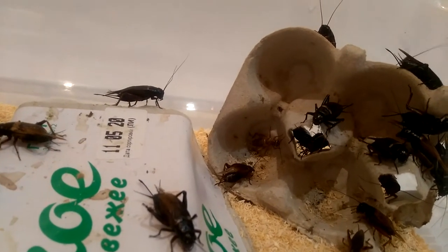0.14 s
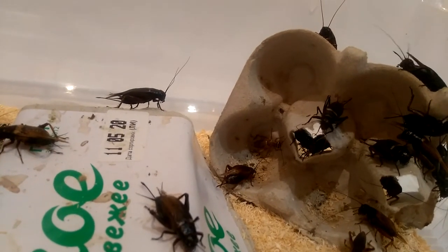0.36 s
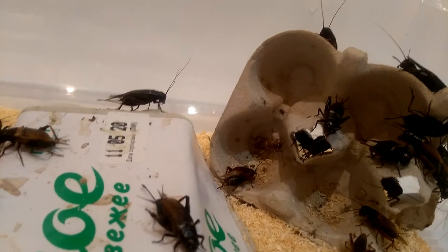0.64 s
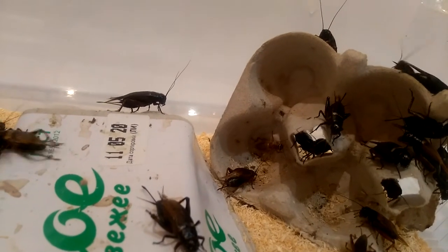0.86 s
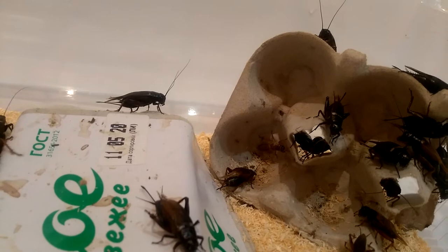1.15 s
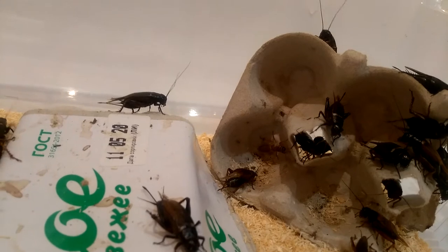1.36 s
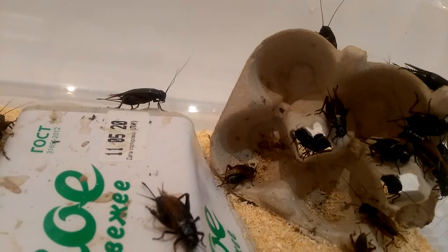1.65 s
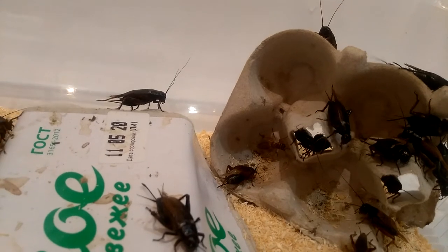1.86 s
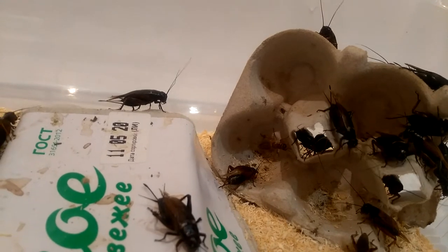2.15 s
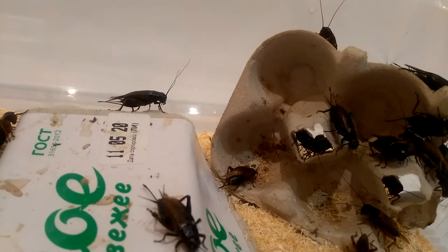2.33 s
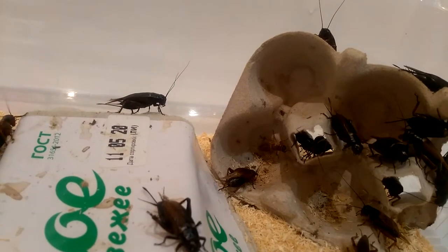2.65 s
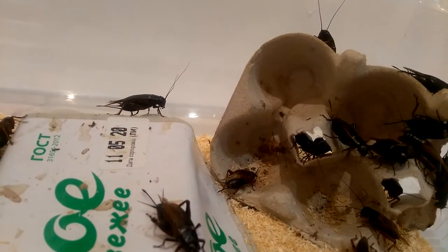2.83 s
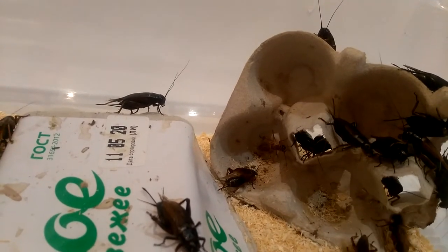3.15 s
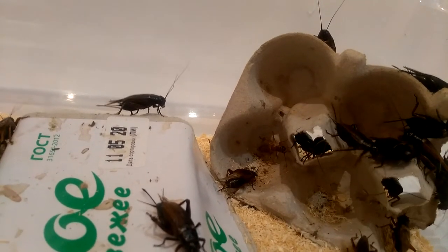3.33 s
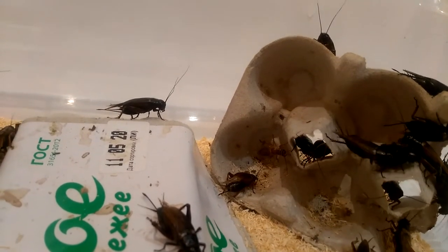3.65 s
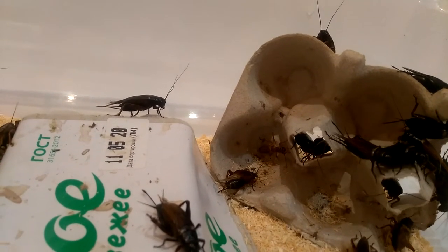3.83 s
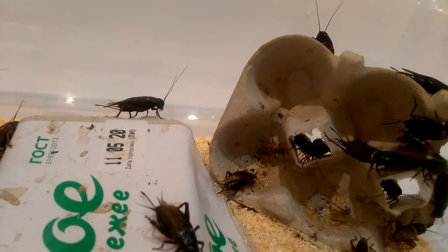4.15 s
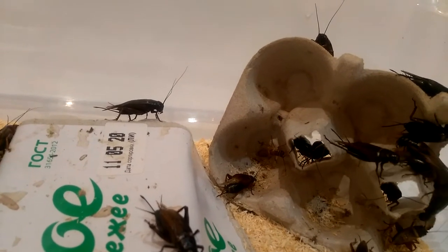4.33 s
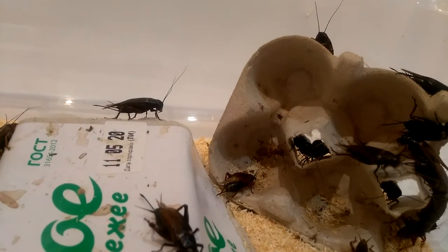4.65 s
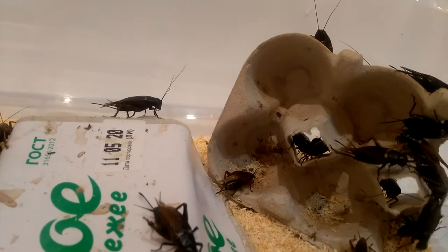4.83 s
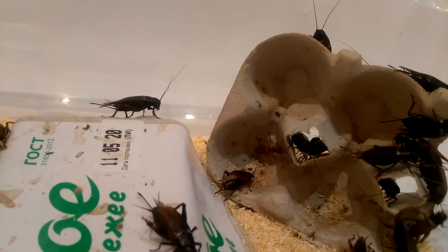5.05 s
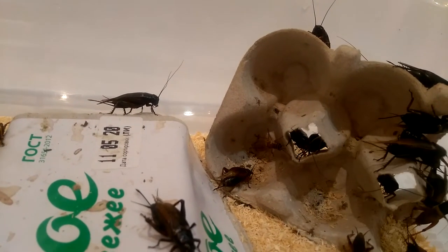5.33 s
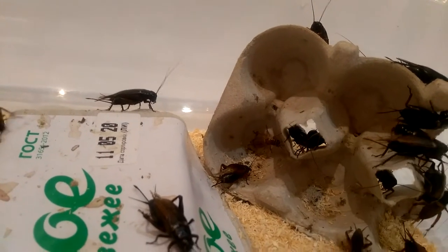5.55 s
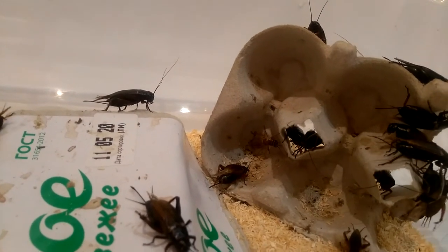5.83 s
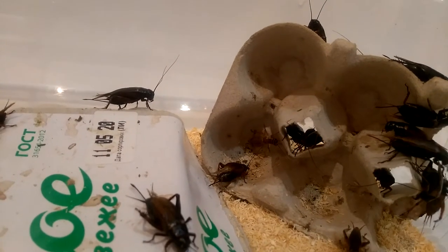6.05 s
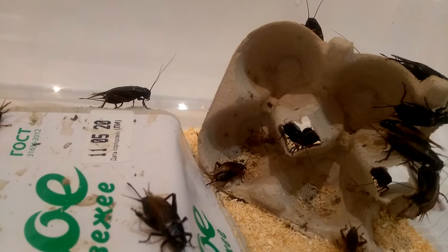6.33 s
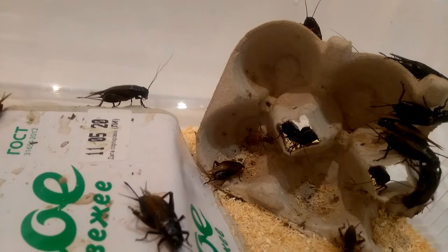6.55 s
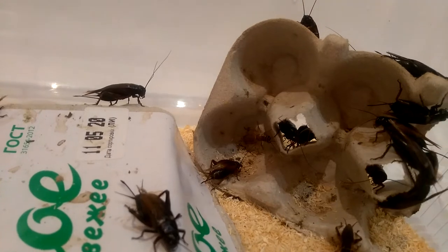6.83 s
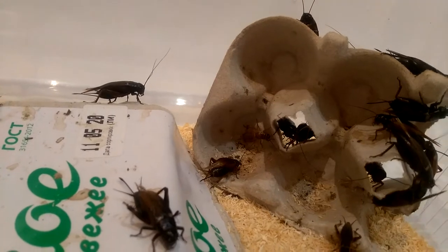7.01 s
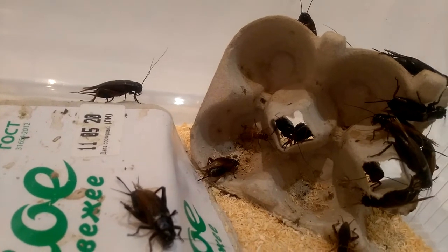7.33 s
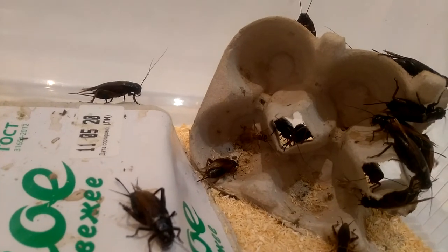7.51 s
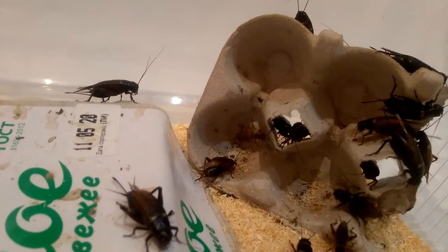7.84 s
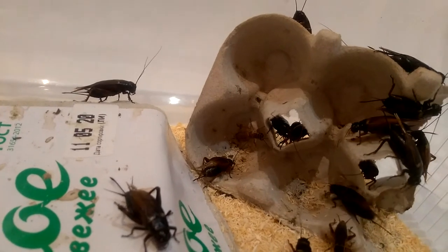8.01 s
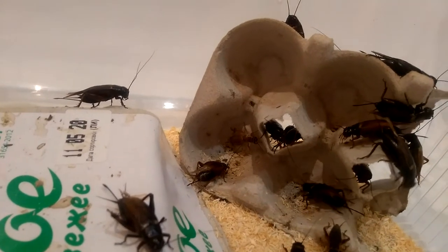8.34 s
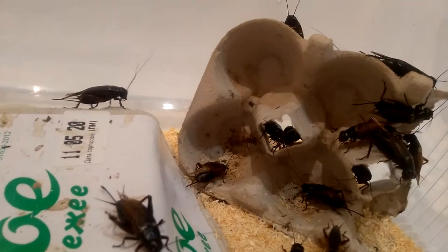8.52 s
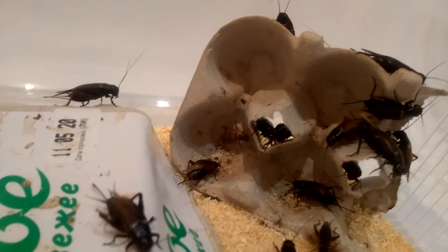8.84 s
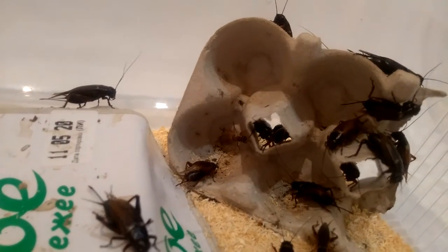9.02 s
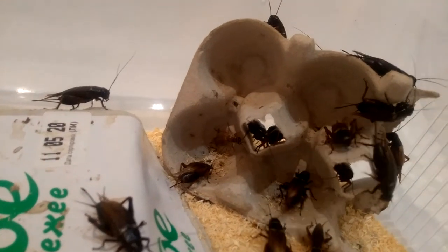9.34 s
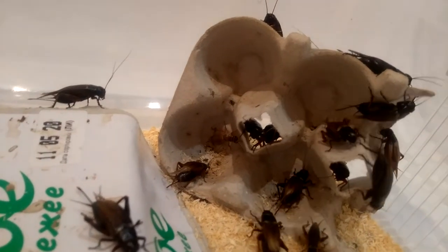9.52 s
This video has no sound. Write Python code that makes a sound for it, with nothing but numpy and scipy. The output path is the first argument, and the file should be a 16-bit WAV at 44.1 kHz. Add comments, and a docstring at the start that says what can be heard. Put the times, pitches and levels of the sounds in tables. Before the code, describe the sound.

A close stereo pickup of crickets in a plastic tub indoors, over a very faint low hum, rumble and hiss. From 0.1 s two singers, both toward the right, give short pulsed chirps around 5 kHz: quick falling strokes, about 29 a second, two to seven per chirp, with raspy overtones and a short plastic ring. The stronger, higher one chirps often until about 4 s. The softer, slightly lower one starts very faint, grows from about 2 s and swells through each chirp. Between 4 and 7 s the softer one mostly carries on, with short gaps and only isolated weaker bursts from the other. From about 7 s both overlap again, the stronger back at full force from 7.7 s until 8.5 s; the softer ends near 9.1 s. Tiny ticks and dry scuffs run throughout, one crisp tick near 9.4 s. Dull low knocks recur, the strongest at 2.7 s.

```python
"""Crickets in a plastic tub

Two male crickets sing in a tub indoors, both to the right of a close stereo microphone.
Each chirp is a run of wing strokes, every one a short falling tone with overtones and scrape, ringing on
in the tub. Feet and bodies patter over cardboard and bran as filtered noise puffs and ticks.
The house hums around twice the mains frequency and rumbles, and dull knocks ring the shelf now and then."""
import sys
import numpy as np
from scipy import signal
from scipy.fft import rfft, irfft, next_fast_len
from scipy.io import wavfile
from scipy.ndimage import uniform_filter1d, map_coordinates

SR = 44100
rng = np.random.default_rng(int(sys.argv[2]) if len(sys.argv) > 2 else 0)


def wrap_up_sound(samples):
    """Save the sound to the file named by the first command line argument, as 16-bit audio."""
    columns = np.atleast_2d(samples).T
    # keep every value between -1 and 1, then stretch to whole-number steps
    tamed = np.clip(columns, -1, 1)
    steps = np.round(tamed * 32767).astype(np.int16)
    wavfile.write(sys.argv[1], SR, steps)


N = 426447

MAINS_HZ = 50
HUM_DB = 2.5  # lift of all hum lines
PERIOD_S = 0.0345  # usual time from stroke to stroke
STEEPEST_HZ_PER_S = 48000  # a short stroke uses only the end of the file
FIRST_TURN_DB = -2  # the weak first stroke of the turning singer reaches the left side less
TOP_HZ = 15800  # band limit of the whole mix

# Hum lines of the house. Each row: multiple of the mains, width in Hz, level in dB before lift and wavering.
HUM_LINES = [(2, 14, -74), (4, 22, -83), (8, 6, -94), (10.3, 12, -101), (15.4, 20, -100)]
# Colour of the house rumble. Each row: frequency in Hz, relative level in dB per Hz.
RUMBLE_COLOUR = [(20, -22), (50, -11.5), (100, -9.5), (160, -3.5), (320, -3.5), (450, -14), (800, -18),
                 (1100, -34.5), (1600, -59)]
# Colour of the microphone hiss. Each row: frequency in Hz, relative level in dB per Hz.
HISS_COLOUR = [(500, -20.5), (1000, 2), (1500, -11.5), (2200, 2), (4000, -11), (7000, -8.5), (10000, -10),
               (15500, -26.5)]
# Likeness of left and right in the room noise. Each row: frequency in Hz, likeness from 0 to 1.
ROOM_ALIKE = [(40, 0.89), (100, 0.94), (300, .7), (700, .3), (2000, .05)]
# Swells of hum and rumble. Each row: time in seconds, level in dB (only the rise and fall about the mean counts).
HOUSE_LEVEL = [(0.0, -74.5), (3.74, -72.5), (4.9, -74), (5.79, -70.5), (7.08, -77.5), (7.27, -71),
               (9.67, -75)]
# Ring of the tub walls. Each row: frequency in Hz, time to fade by 60 dB in seconds, relative level in dB.
TUB_RING = [(1000, 0.18, -5), (4700, 0.066, 4), (5380, 0.22, 0), (5200, 0.22, -10.5), (10300, 0.18, -7),
            (15010, 0.1, 1.5)]
# Feet and bodies on cardboard. Each row: start in seconds, level in dB at the crest, centre in Hz,
# width in octaves, half the puff's span in seconds, left minus right in dB.
SCUFFS = [(0.027, -60.5, 6470, 0.81, 0.0066, -8.5), (0.376, -71, 2500, 0.35, 0.03, 9),
          (1.469, -76, 1500, 1.2, .015, -11), (1.58, -62, 2430, 0.34, 0.0073, 8),
          (1.978, -69, 2050, 0.66, 0.022, 8), (2.138, -72.5, 2600, 0.6, 0.01, 1.5),
          (2.463, -81.5, 2490, 0.62, 0.077, 6), (3.16, -65.5, 2400, 0.37, 0.014, 4),
          (3.399, -66, 1860, 0.7, 0.013, 1), (3.658, -69, 2220, 1.4, 0.032, -3),
          (3.974, -64.5, 2040, 0.38, 0.0072, 12), (4.644, -68, 1162, 2.9, 0.015, -4),
          (4.658, -65, 4970, 2.3, 0.016, -8), (4.745, -76, 2600, 0.69, 0.012, 1.5),
          (4.76, -74, 7600, 0.78, 0.028, -8), (4.815, -73, 5330, .5, .008, -3),
          (4.975, -70, 1520, 1.7, 0.085, 2.5), (6.25, -70, 2500, 0.46, .03, 0.5),
          (6.299, -66.5, 1180, 2.3, 0.012, -9), (6.6, -74, 2800, 1.2, .006, -4),
          (7.627, -66, 2060, 0.29, 0.018, 6), (8.198, -72, 2355, 0.94, 0.027, -3.5),
          (9.32, -71, 5200, .6, .004, -5), (9.353, -72, 4900, .3, .004, -5),
          (9.371, -57, 5500, 0.74, 0.0029, -8), (9.608, -75, 4600, 1.8, 0.0044, -3)]
# Colour of the ticking feet. Each row: frequency in Hz, relative level in dB per Hz.
FEET_COLOUR = [(700, -21.5), (2000, -6), (3600, -22.5), (4700, 5.5), (7000, 2.5), (12000, -13),
               (15500, -36.5)]
# Partials of each singer. Each row: multiple of the stroke's pitch, right level in dB, extra left level in dB,
# left phase lead in radians, share of effort followed, sharpness of swell, flutter in dB.
HIGH_TONE = [(1, 0, -15, 2.95, 1, .95, .25), (2, -29, -18, 1.1, .5, 1.1, 1.5), (3, -42, -6, .3, .5, 1.1, 3)]
LOW_TONE = [(1, 0, 0, -1.2, 1, .9, .8), (1.5, -30, -14, .7, .9, 3, 4), (2, -26, -10, 1.1, .3, 1.1, 2.2),
            (2.5, -25, -5, .7, .9, 3, 4), (3, -30, -3, .3, .5, 1.3, 3.5)]
# Scraper on the file, coloured by the wing. Each row: frequency in Hz, relative level in dB per Hz.
HIGH_RASP_COLOUR = [(700, -44), (2500, -39.5), (4300, -39.5), (5200, -3), (6200, -10.5), (8500, -13),
                    (10300, -11), (12000, -19.5), (15500, -21.5)]
LOW_RASP_COLOUR = [(700, -46), (2500, -43.5), (4200, -32), (5000, 0.5), (6300, -9), (7700, -8.5),
                   (8700, -17.5), (10000, 1), (11500, -21), (12700, -10.5), (13800, -12.5), (15300, -11.5)]
# Colour of the faint noise puff just before each chirp, as the wings open.
# Each row: frequency in Hz, relative level in dB per Hz.
OPENING_COLOUR = [(2000, -36), (4500, -1.5), (5200, 1), (9500, -1), (13000, -8.5), (15500, -16.5)]
# Shade of the microphone body over its left port. Each row: frequency in Hz, gain in dB.
LEFT_SHADE = [(5500, -1), (7500, -14), (10000, -13.5), (13000, -5.5)]
# Overtones and scrape. Each row: time in seconds, higher singer's gain in dB, lower singer's gain in dB.
TREBLE_LEVEL = [(0, -5.5, -4), (1.5, -6.5, -4.5), (2.499, -7, -7.5), (3.502, -7, -5), (4.499, -5.5, -5.5),
                (5.499, -2.5, -4.5), (6.5, -2.3, -2.5), (7.499, -1.5, -3.5), (8.499, -7, -3),
                (9.2, -10, -4.5)]
# Chirps of the higher singer. Each row: first stroke in seconds, last stroke in seconds, length of the first
# stroke in seconds, first level in dB, last level in dB, top pitch in Hz.
HIGH_SONG = [(0.1561, 0.2526, 0.0099, -17.5, -9, 5420), (0.388, 0.489, 0.014, -12, -10.5, 5430),
             (0.585, 0.6529, .02, -14, -9.5, 5420), (0.9585, 1.0595, 0.024, -13, -9.5, 5410),
             (1.1543, 1.1864, 0.021, -11, -9, 5490), (1.294, 1.3268, 0.016, -10.5, -8.5, 5480),
             (1.4698, 1.5387, 0.02, -10, -9.5, 5496), (1.9451, 2.0507, 0.018, -11, -10.5, 5460),
             (2.2203, 2.2861, 0.011, -8.5, -8.5, 5450), (2.4143, 2.4802, .016, -10, -8, 5466),
             (2.614, 2.6805, 0.021, -10, -8, 5503), (3.0942, 3.1942, 0.021, -12.5, -9, 5454),
             (3.6666, 3.7652, 0.017, -8.5, -10.5, 5440), (3.9939, 4.0595, .02, -12, -9, 5470),
             (5.266, 5.3317, .015, -19.5, -12.5, 5380), (6.368, 6.432, 0.015, -17, -12, 5320),
             (7.1051, 7.1706, .014, -15, -10.5, 5370), (7.7221, 7.7887, 0.014, -11, -8.5, 5430),
             (8.0721, 8.1382, 0.015, -10, -7.5, 5437), (8.4603, 8.5278, 0.012, -12, -7.5, 5490)]
# Chirps of the lower singer, who turns about. Each row: the same columns, then extra left minus right in dB.
LOW_SONG = [(0.139, 0.2075, 0.0085, -28, -19.5, 5180, -9), (0.4889, 0.5607, .007, -24, -19, 5180, -5.5),
            (0.7871, 0.8567, 0.0065, -25.5, -19, 5160, -3.5), (1.335, 1.4342, .008, -30.5, -23, 5330, -7.5),
            (1.8543, 2.0566, 0.0079, -25, -14.5, 5315, -6),
            (2.1687, 2.2695, .022, -23.5, -11.5, 5380, -6.5),
            (2.4365, 2.5371, 0.014, -24, -13.5, 5450, -5.5),
            (2.6958, 2.7955, 0.022, -22.5, -13.5, 5450, -4.5),
            (2.9694, 3.0709, 0.023, -22, -12.5, 5450, -9), (3.2879, 3.3888, 0.018, -23, -14.5, 5416, -7.5),
            (3.568, 3.6671, 0.018, -24, -13.5, 5488, -8.5),
            (4.0963, 4.1969, 0.0058, -22.5, -14.5, 5360, -8.5), (4.3981, 4.466, 0.02, -26, -15, 5394, -5),
            (4.8783, 5.0172, 0.0078, -25.5, -14.5, 5200, -6.5),
            (5.1585, 5.2572, 0.023, -24, -12.5, 5390, -5.5), (5.5273, 5.6263, 0.015, -21, -13, 5363, -4.5),
            (5.8501, 5.9192, 0.019, -25, -17.5, 5200, -3), (6.09, 6.1876, 0.015, -21.5, -12.5, 5340, -2.5),
            (6.3942, 6.4933, 0.019, -22.5, -13, 5320, -2), (6.6666, 6.7631, .017, -18.5, -13, 5360, -5),
            (7.2911, 7.3884, 0.012, -20.5, -15, 5340, -7), (7.6121, 7.6761, .015, -16.5, -15.5, 5310, -6),
            (7.8208, 7.8858, .012, -18, -13.5, 5350, -6.5), (8.1822, 8.2484, .017, -19.5, -15, 5330, -6.5),
            (8.4318, 8.5023, .02, -19.5, -10.5, 5286, -6), (8.7806, 8.8497, 0.019, -16.5, -12.5, 5310, -10),
            (9.0015, 9.0772, 0.022, -20, -12, 5313, -12)]
# How each singer strokes. Keys: length of a full stroke in seconds and its end pitch in Hz; for the first of
# a chirp, top and end pitch lower by Hz, end lower too by sag in Hz per missing second, lateness as a share
# of its missing length; powers by which effort builds, length grows and the pace slows along a chirp.
HIGH_WING = dict(length=.02, end_hz=5028, sag=500, flat_top_hz=40, flat_end_hz=7.5, late=0.14, builds=0.98, lengthens=1.8, slows=1.04)
LOW_WING = dict(length=.022, end_hz=4679, sag=9000, flat_top_hz=59.7, flat_end_hz=92, late=0.15, builds=2, lengthens=4.0, slows=1.02)
# Knocks through the shelf. Each row: time in seconds (onset 10 ms sooner), peak level in dB.
KNOCKS = [(1.552, -56), (1.703, -60), (1.911, -54.5), (2.659, -43), (4.043, -56.5), (4.578, -50.5),
          (4.994, -56.5), (5.485, -49), (5.626, -47), (6.15, -60.5), (6.404, -51.5), (6.504, -58.5),
          (6.778, -55.5), (7.008, -55.5), (7.79, -50.5), (8.152, -49.5), (8.447, -54)]
# Low modes of the shelf. Each row: frequency in Hz, relative level in dB, time to fade by 60 dB in seconds.
SHELF_MODES = [(88.6, 9, 0.1), (179, -6, 0.16), (60, -9, 0.11), (35.86, -14.5, 0.19)]


def amp(db):
    """Decibels to amplitude."""
    return 10 ** (np.asarray(db) / 20)


def unit(x):
    """Scales a sound to rms 1."""
    return x / np.sqrt(np.mean(x ** 2) + 1e-20)


def along(points, hz):
    """Reads a curve of (Hz, value) points on a log frequency axis."""
    f, v = np.transpose(points)
    return np.interp(np.log(hz + 1), np.log(f + 1), v)


def coloured(points):
    """Turns (Hz, dB) points into a gain curve over frequency."""
    return lambda hz: amp(along(points, hz))


def wobble(rate):
    """A smooth random curve, rate knots a second."""
    knots = rng.standard_normal(int(N * rate / SR) + 4)
    return map_coordinates(knots, [np.arange(N) * rate / SR])


def filtered(x, response):
    """Shapes a sound by a gain curve over frequency."""
    m = next_fast_len(N + SR // 2)
    return irfft(rfft(x, m) * response(np.fft.rfftfreq(m, 1 / SR)), m)[..., :N]


def noise(gain, alike, patchy_db=0):
    """Stereo noise of rms 1 in patches of random gain; alike sets the likeness of the sides by frequency."""
    white = rng.standard_normal((2, N))
    if patchy_db:
        z = signal.stft(white, nperseg=512)[2]
        patches = rng.standard_normal(z.shape[1:])
        patches = uniform_filter1d(patches, size=8, axis=0)  # across frequency
        patches = uniform_filter1d(patches, size=5, axis=1)  # across time
        white = signal.istft(z * amp(patchy_db * unit(patches)), nperseg=512)[1][:, :N]

    def mid_side(hz):
        angle = np.arccos(np.clip(along(alike, hz), -1, 1)) / 2
        return gain(hz) * [np.cos(angle), np.sin(angle)]

    mid, side = filtered(white, mid_side)
    return unit(np.array([mid + side, mid - side]))


def add(track, s, piece):
    """Mixes a piece into a track from s seconds on."""
    part = track[..., round(s * SR):][..., :piece.shape[-1]]
    part += piece[..., :part.shape[-1]]


def room():
    """Wavering hum lines and a lumpy rumble of the house, over a faint hiss."""
    lumps = wobble(10)  # shared by hum and rumble
    hum = np.zeros((2, N))
    for multiple, width, db in HUM_LINES:
        line = noise(lambda hz: 1 / (1 + (2 * (hz - multiple * MAINS_HZ) / width) ** 2), ROOM_ALIKE)
        hum += amp(HUM_DB + db + 0.98 * lumps + 1.5 * wobble(3.9)) * line
    rumble = noise(coloured(RUMBLE_COLOUR), ROOM_ALIKE, patchy_db=2.5)
    rumble *= amp(-79 + 1.5 * lumps + 1.5 * wobble(16))
    hiss = amp(-88) * noise(coloured(HISS_COLOUR), ROOM_ALIKE, patchy_db=2.0)
    s, db = np.transpose(HOUSE_LEVEL)
    house_db = np.interp(np.arange(N) / SR, s, db - db.mean())
    return amp(house_db) * (hum + rumble) + hiss


def tub(x, wet_db):
    """The walls answer a mono sound with fading noise, differently on each side."""
    hz, t, z = signal.stft(rng.standard_normal((2, SR // 2)), SR, nperseg=256)
    f, t60, db = np.transpose(TUB_RING)
    fading_db = np.interp(hz, f, db)[:, None] - 60 * t / np.interp(hz, f, t60)[:, None]
    tail = signal.istft(z * amp(fading_db), SR, nperseg=256)[1]
    tail = np.pad(tail, ((0, 0), (round(0.0011 * SR), 0)))  # the way to the walls, in seconds
    tail /= np.linalg.norm(tail[0])
    return amp(wet_db) * signal.fftconvolve(x[None], tail, axes=1)[:, :N]


def patter():
    """Single scuffs as puffs of band-passed noise, over a thin random ticking of many feet, all in the tub."""
    out = np.zeros((2, N))
    for s, db, hz, octaves, length, pan_db in SCUFFS:
        edges = [hz * 2 ** (-octaves / 2), min(hz * 2 ** (octaves / 2), SR / 3)]
        band = signal.butter(2, edges, "bandpass", fs=SR, output="sos")
        u = np.linspace(0, 6, round(2 * length * SR))
        puff = unit(signal.sosfilt(band, rng.standard_normal((2, len(u)))))
        puff *= u * np.exp(1 - u)  # quick rise, slower fall
        add(out, s, amp(db + np.array([[pan_db / 2], [-pan_db / 2]])) * puff)
    struck = rng.random((2, N)) < 40 / SR  # about 40 ticks a second on each side
    ticks = struck * amp(5 * rng.exponential(size=(2, N)).clip(0, 3))
    ticks = signal.fftconvolve(ticks, np.hanning(round(0.006 * SR))[None], "same", axes=1)
    out += amp(-90 + 4 * wobble(5)) * ticks * noise(coloured(FEET_COLOUR), [(1000, 0.3)])
    return out + tub(out.mean(0), -6)


def strokes(chirps, length, end_hz, sag, flat_top_hz, flat_end_hz, late, builds, lengthens, slows):
    """Strokes at a slowing pace that build from a short, weak, flat first one to full effort."""
    rows = []
    for first, last, first_length, first_db, last_db, top_hz, *turn in chirps:
        count = round((last - first) / PERIOD_S) + 1
        begin = first - late * (length - first_length)
        due = begin + (last - begin) * np.linspace(0, 1, count) ** slows
        for k, s in enumerate(due):
            to_go = 1 - k / (count - 1)
            slack = to_go ** builds
            missing = (length - first_length) * to_go ** lengthens
            # no two strokes alike
            longer, top_shift, end_shift, db_shift = rng.normal(0, [0.03, 15, 15, 0.4])
            lasts = (length - missing) * (1 + longer)
            to_hz = end_hz - (flat_end_hz + sag * missing) * (k == 0) + end_shift
            wanted_hz = top_hz - flat_top_hz * slack + top_shift
            from_hz = min(wanted_hz, to_hz + STEEPEST_HZ_PER_S * lasts)
            db = last_db + (first_db - last_db) * slack + db_shift
            side_db = [pan_db + FIRST_TURN_DB * (k == 0) for pan_db in turn]
            rows.append((s if k else first, lasts, from_hz, to_hz, db, *side_db))
    return rows


def singer(strokes, partials, scrape, treble, skew, edge, linger, scrape_db, open_db, wet_db):
    """A file of teeth drives the wing at a falling rate; overtones and scrape follow effort only in part."""
    tone, rasp, opening, first_burst = np.zeros((4, 2, N))
    before = -1
    uneven = wobble(450)  # teeth differ in size
    for s, length, first_hz, last_hz, db, *turn in strokes:
        u = np.arange(round(length * SR)) / (length * SR)
        swell = np.abs(np.sin(np.pi * u ** skew))
        edge_share = np.clip(np.minimum(u, 1 - u) * length / edge, 0, 1)
        soft_ends = np.sin(np.pi / 2 * edge_share) ** 2
        falling_hz = first_hz + (last_hz - first_hz) * u
        phase = 2 * np.pi * (np.cumsum(falling_hz) / SR + rng.random())
        treble_db = np.interp(s, *treble)
        teeth = uneven[round(s * SR):][:len(u)]
        for k, right_db, left_db, lead, follow, sharp, flutter_db in partials:
            level_db = right_db + follow * db + (k > 1) * (treble_db + rng.normal(0, 0.5))
            size = amp(level_db + flutter_db * teeth) * swell ** sharp * soft_ends
            left = amp(left_db + sum(turn)) * np.sin(k * phase + lead)
            add(tone, s, size * [left, np.sin(k * phase)])
        drag = np.linspace(0, np.pi, round(linger * length * SR))  # the wings still rub while they reopen
        rub = np.abs(np.sin(drag))[None] ** 0.23 * np.exp(-0.5 * drag)
        add(rasp, s, amp(0.14 * db + treble_db + rng.normal(0, 1.5)) * rub)
        if s - before > 0.06:  # the first stroke of a chirp
            # a faint puff just before the chirp, as the wings open
            add(opening, s - 0.019, np.hanning(round(0.009 * SR))[None] * amp(rng.normal(0, 3)))
            # a burst of 0.9 to 4.3 kHz noise under each chirp's first stroke
            add(first_burst, s, np.hanning(round(length * SR))[None] * amp(db + rng.normal(0, 2)))
        before = s
    apart = [(1000, 0.1)]  # sides nearly unalike
    rasp *= amp(scrape_db + 3.8 * wobble(120)) * noise(coloured(scrape), apart, patchy_db=3.5)
    opening *= amp(open_db) * noise(coloured(OPENING_COLOUR), apart)
    first_burst *= amp(-53.5) * noise(lambda hz: (hz > 900) * (hz < 4300) * hz, apart)

    def radiated(hz):  # the small wing sends out little below its tone
        return 1 / (1 + (4400 / (hz + 1)) ** 24)

    voice = filtered(tone, radiated)
    # scrape spreads more evenly than the tone, so more of it meets the walls
    echoes = tub(voice[1] + 5.1 * (rasp[1] + opening[1]), wet_db)
    rustle = rasp + opening + first_burst + echoes
    return voice + [filtered(rustle[0], coloured(LEFT_SHADE)), rustle[1]]


def crickets():
    """The higher singer's strokes swell early and rub on long; the lower one's swell evenly and stop sooner."""
    s, high_db, low_db = np.transpose(TREBLE_LEVEL)
    # edge in seconds, linger in stroke lengths, levels in dB for left and right
    high = singer(strokes(HIGH_SONG, **HIGH_WING), HIGH_TONE, HIGH_RASP_COLOUR, (s, high_db),
                  skew=0.85, edge=0.0016, linger=2.7,
                  scrape_db=[[-50], [-38]], open_db=[[-64], [-58]], wet_db=[[-20], [-20]])
    low = singer(strokes(LOW_SONG, **LOW_WING), LOW_TONE, LOW_RASP_COLOUR, (s, low_db),
                 skew=1.0, edge=0.0025, linger=1.08,
                 scrape_db=[[-40], [-30]], open_db=[[-62], [-54]], wet_db=[[-15], [-14]])
    return high + low


def jolts():
    """Each knock sets the shelf's low modes going with a soft start."""
    out, t = np.zeros((2, N)), np.arange(SR // 3) / SR
    for s, db in KNOCKS:
        ring = np.zeros((2, len(t)))
        for hz, level_db, t60 in SHELF_MODES:
            fading_db = level_db + rng.normal(0, 0.87, (2, 1)) - 60 * t / t60
            ring += amp(fading_db) * np.sin(2 * np.pi * hz * t * rng.normal(1, 0.04))
        ring *= np.clip(t / 0.027, 0, 1) ** 2  # soft start in seconds
        add(out, s - 0.01, amp(db) * ring / np.abs(ring).max())
    return out


def scene():
    """The house, the patter, the two singers and the knocks together."""
    return room() + patter() + crickets() + jolts()


def record(dry):
    """A steep low-pass: next to nothing gets through above the band limit."""
    return filtered(dry, lambda hz: 1 / (1 + (hz / TOP_HZ) ** 300))


dry = scene()
out = record(dry)
wrap_up_sound(out)
```